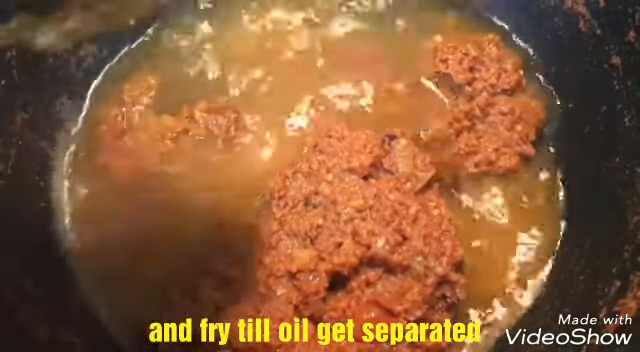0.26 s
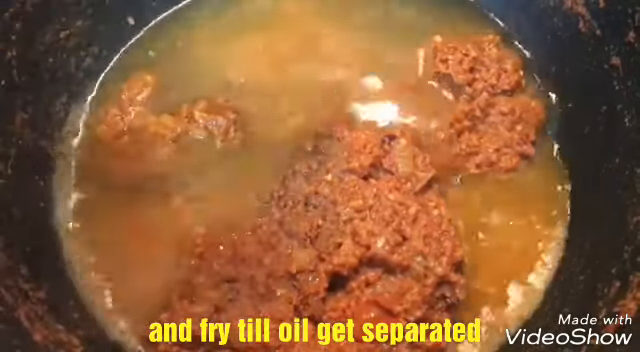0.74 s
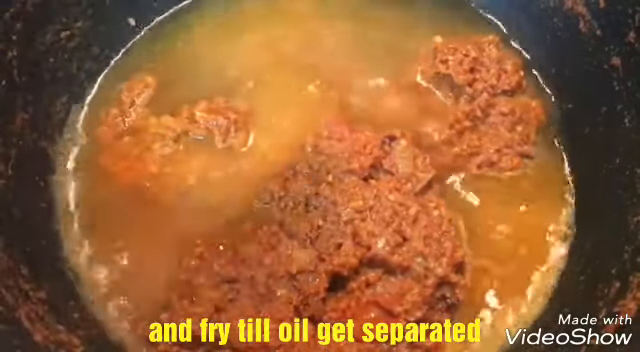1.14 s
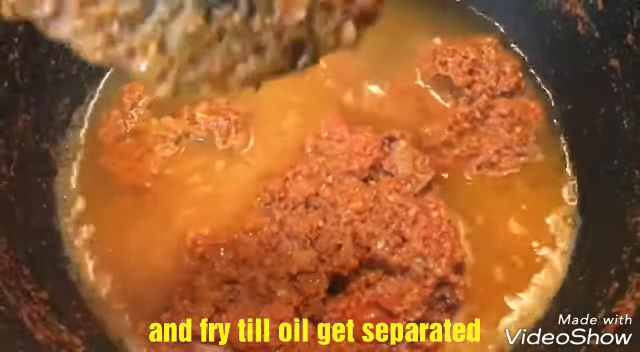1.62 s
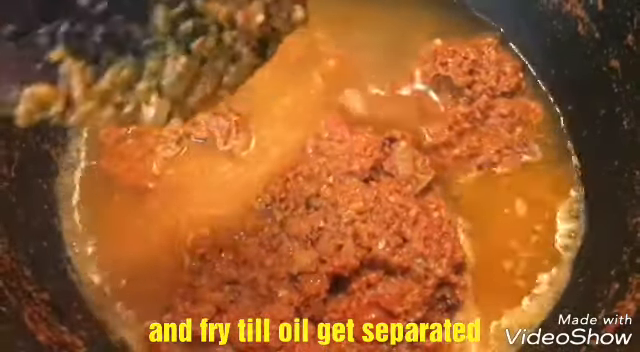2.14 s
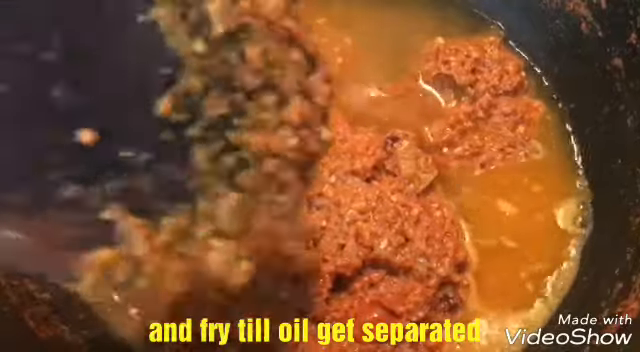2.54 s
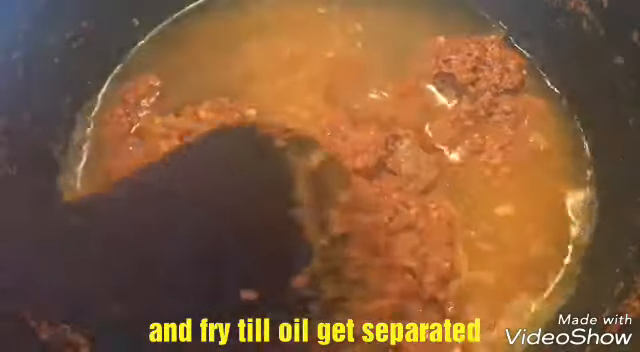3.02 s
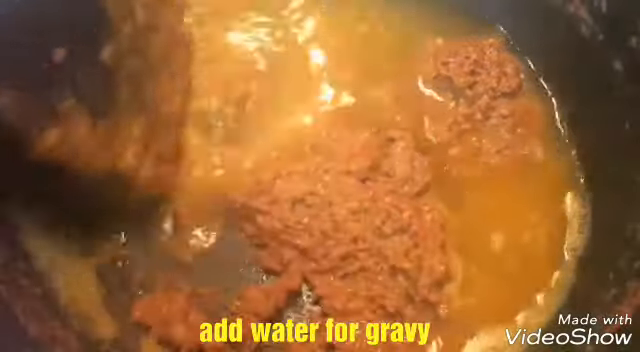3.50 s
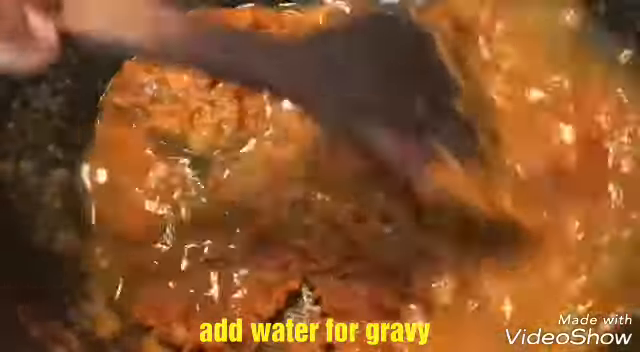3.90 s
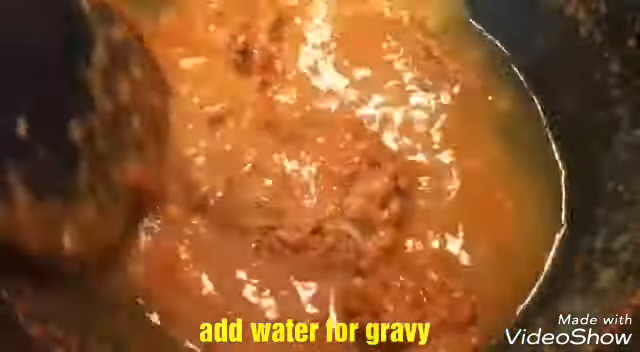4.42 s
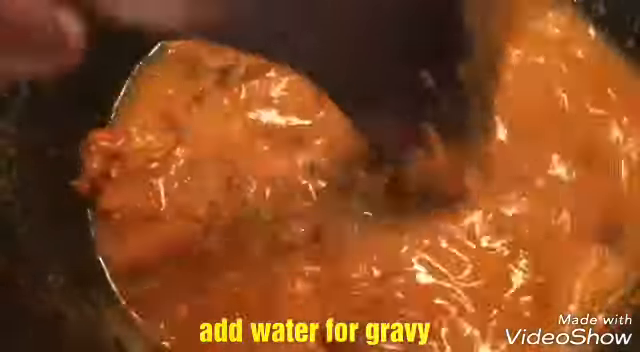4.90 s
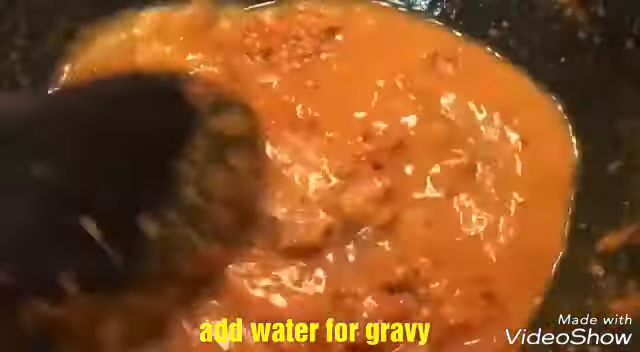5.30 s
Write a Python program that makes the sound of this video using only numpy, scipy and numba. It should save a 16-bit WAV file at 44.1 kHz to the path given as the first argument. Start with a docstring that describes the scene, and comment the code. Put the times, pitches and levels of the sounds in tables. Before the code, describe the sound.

Wet spice paste boils and sizzles loudly in hot oil, with sharp spits, one hard wooden knock, then wetter bubbling as it is stirred.

```python
"""A dense hiss and crackle comes first: wet spice paste boils in hot oil in a deep pan, close to a phone.
Steam bubbles burst in random swarms coloured by the pan's bowl; surges, blubs and sharp spits of oil stand out.
A low kitchen rumble of filtered noise lies below. A knock rings on wood as fading tones, and the room answers.
Later come soft spoon bumps made of loose tones, brief dulling by the spoon, and gurgles of sliding tones."""
import sys
import numpy as np
from scipy import signal
from scipy.fft import rfft, irfft, next_fast_len
from scipy.io import wavfile
from scipy.ndimage import uniform_filter1d, map_coordinates
from numba import njit

SR = 44100
rng = np.random.default_rng(int(sys.argv[2]) if len(sys.argv) > 2 else 0)


def wav_record(signal):
    """Record a signal, one row per channel, as 16-bit PCM in the file named by sys.argv[1]."""
    frames = np.transpose(np.atleast_2d(signal))
    bounded = np.clip(frames, -1, 1)
    # unit amplitude maps onto the largest positive 16-bit level
    quanta = np.round(bounded * 32767).astype(np.int16)
    wavfile.write(sys.argv[1], SR, quanta)


def attenuation_scalar(level_db):
    """Turn a level in dB into a linear amplitude multiplier (20 dB per decade)."""
    decades = np.asarray(level_db, float) / 20
    return 10 ** decades


N = 244755
T = np.arange(N) / SR
HZ = np.maximum(np.fft.rfftfreq(next_fast_len(N), 1 / SR), 1)


def unit(x):
    """Scale to an rms of 1."""
    return x / np.sqrt(np.mean(x ** 2))


def shape(x, gain):
    """Filter by a gain per frequency."""
    size = next_fast_len(N)
    return irfft(rfft(x, size) * gain, size)[:N]


def spectrum(points):
    """Gain of (pitch_hz, level_db) points joined on a log pitch axis."""
    hz, db = np.transpose(points)
    return attenuation_scalar(np.interp(np.log(HZ), np.log(hz), db))


def band(low_hz, high_hz, order=4):
    """Gain of a soft-edged band; neighbours add up to flat power."""
    low_edge = 1 + (low_hz / HZ) ** (2 * order)
    high_edge = 1 + (HZ / high_hz) ** (2 * order)
    return 1 / np.sqrt(low_edge * high_edge)


def walk(rate):
    """Random levels held 1 / rate s, smoothed twice, with the slow drift taken out; spread 1."""
    hold = int(SR / rate)
    steps = np.repeat(rng.standard_normal(N // hold + 1), hold)
    smooth = uniform_filter1d(uniform_filter1d(steps, hold), hold)[:N]
    return unit(smooth - uniform_filter1d(smooth, 2 * hold))


def add(out, start_s, level_db, pitch_hz, t60_s, rise_s, glide=0.):
    """Add a fading ring, cut off at t60_s (60 dB down); its pitch ends higher by a share of 2 * glide."""
    start = int(start_s * SR)
    t = T[:min(int(t60_s * SR), N - start)]
    fade = np.exp(-np.log(1000) * t / t60_s) * (1 - np.exp(-t / rise_s))
    tone = np.sin(2 * np.pi * pitch_hz * t * (1 + glide * t / t60_s))
    out[start:start + len(t)] += attenuation_scalar(level_db) * fade * tone


@njit
def rings(start, hz, size, cycles, glide):
    """Each trapped bubble rings for some cycles, rising a little as it nears the surface."""
    out = np.zeros(N)
    for k in range(len(start)):
        length = min(int(cycles * SR / hz[k]), N - start[k])
        fade = np.exp(-np.log(1000) / (cycles * SR / hz[k]))
        phase = 0.
        gain = size[k]
        for i in range(length):
            phase += 2 * np.pi * hz[k] / SR * (1 + glide * i / length)
            gain *= fade
            onset = min(16 * i / length, 1.)
            out[start[k] + i] += gain * onset * np.sin(phase)
    return out


# how hard the pan boils: (time_s, level_db), of which only the distance from a medium boil counts
BOIL = [(0, -31.5), (.3, -32), (.43, -30.5), (.53, -32.5), (.85, -32), (1.0, -33.5), (1.25, -33.5),
        (1.31, -34.5), (1.4, -34), (1.52, -35.5), (1.9, -35), (2.1, -34.5), (2.45, -35.5), (2.62, -36),
        (2.79, -36), (2.95, -38.5), (3.06, -39), (3.3, -33.5), (3.42, -34.5), (3.5, -36), (3.7, -33.5),
        (3.82, -35), (4.148, -33), (4.158, -38.5), (4.24, -36.5), (4.33, -36.5), (4.41, -34), (4.76, -35.5),
        (4.85, -36.5), (5.06, -39.5), (5.17, -41.5), (5.21, -40), (5.3, -40.5), (5.55, -40.5)]
MEDIUM_BOIL_DB = -35
# colour of the boiling: (pitch_hz, level_db)
COLOUR = [(240, -48), (400, -14.5), (721, -3), (1090, -8.5), (1450, -4.5), (1810, -5), (2100, -4.5),
          (4990, -3.5), (5640, -6), (9500, 0.5), (10600, -15), (13800, -30), (22000, -120)]
# air resonances of the pan's bowl: (pitch_hz, width_hz, gain_db)
BOWL = [(750, 110, 4), (1470, 300, 4.5), (1825, 82, -2.5), (3550, 330, -0.7), (4940, 160, -6),
        (5740, 960, 6.5), (6730, 730, 4), (10080, 440, 7)]
# bubble sizes, roughly fine to big: (low_hz, high_hz, bursts_per_s, size_spread_db, flicker_db, flickers_per_s,
# ringing_bubbles_per_s, ringing_level_db against the bursts)
SIZES = [(4305, 5350, 6000, 2, 1.35, 30, 150, -3.5), (5433, 12400, 15000, 0, 0.7, 32, 700, -8),
         (2978, 4270, 9000, 1.5, 1.35, 38, 260, -9.5), (1858, 2720, 6000, 6, 0.43, 31, 150, -7.5),
         (1142, 1900, 4000, 2.5, 0.8, 32, 160, -11), (441.5, 1240, 3000, 2.5, 0.63, 39, 140, -11)]
# how each size follows the boil, mostly less when bigger: (medium_boil_level_db, share of the boil's dB change)
FOLLOW = [(-43.5, 1.26), (-35.5, 1.19), (-39.5, 0.9), (-42, 0.58), (-43, 0.17), (-48.5, 0.47)]
SWARM_DB, SWARM_RATE = 0.37, 22.01  # flicker shared by all sizes: spread, steps per s
# a ringing bubble: cycles until 60 dB down, rise in pitch (share), range of sizes (dB)
RING_CYCLES, RING_GLIDE, RING_SPREAD_DB = 198, 0.027, 18.5
# inward snaps: per s, size spread, level against each size's rain
SNAP_RATE, SNAP_SPREAD_DB, SNAP_DB = 250, 3.5, -14


def boiling():
    """Each bubble size is a random rain of bursts in swarms, with a few that ring; returns it and a bare rain."""
    boil_db = np.interp(T, *np.transpose(BOIL)) - MEDIUM_BOIL_DB
    bowl_db = sum(db / (1 + (2 * (HZ - hz) / width) ** 2) for hz, width, db in BOWL)
    colour = spectrum(COLOUR) * attenuation_scalar(bowl_db)
    swarm, sizzle, bare_rain = walk(SWARM_RATE), 0, 0
    # collapsing steam pockets snap inward and reach every band at once
    snaps = -attenuation_scalar(SNAP_SPREAD_DB * rng.standard_normal(N)) * (rng.random(N) < SNAP_RATE / SR)
    for (level_db, share), row in zip(FOLLOW, SIZES):
        low_hz, high_hz, rate, spread_db, flicker_db, flickers, ringers, ring_db = row
        burst_size = rng.choice([-1, 1], N) * attenuation_scalar(spread_db * rng.standard_normal(N))
        bursts = (rng.random(N) < rate / SR) * burst_size
        when, pitch, size = rng.random((int(ringers * N / SR), 3)).T
        start = (when * N).astype(np.int64)
        ring_hz = low_hz + pitch * (high_hz - low_hz)
        ring_size = attenuation_scalar(RING_SPREAD_DB * size ** 2)  # mostly small, few loud
        bubbles = rings(start, ring_hz, ring_size, RING_CYCLES, RING_GLIDE)
        gain = colour * band(low_hz, high_hz)
        rain = unit(shape(bursts, gain)) + attenuation_scalar(ring_db) * unit(shape(bubbles, gain))
        rain = unit(rain + attenuation_scalar(SNAP_DB) * unit(shape(snaps, gain)))
        rain = rain * attenuation_scalar(SWARM_DB * swarm + flicker_db * walk(flickers))
        sizzle = sizzle + rain * attenuation_scalar(level_db + share * boil_db)
        bare_rain = bare_rain + rain * np.sqrt(high_hz - low_hz)  # evens out wide and narrow bands
    return sizzle, bare_rain


# surges of bubbles of one size, most of them where the spoon turns wet paste onto hot metal:
# (start_s, length_s, level_db, start_pitch_hz, end_pitch_hz)
SURGES = [(0, 0.029, -33.5, 1185, 1210), (0.028, 0.096, -39.5, 2196, 2110), (0.263, 0.2, -40.5, 2080, 2086),
          (0.502, 0.13, -43, 3500, 3500), (0.954, 0.18, -39, 2990, 3000), (1.099, 0.071, -34.5, 3110, 3280),
          (1.212, 0.059, -35, 3240, 3210), (1.3, 0.41, -43, 2167, 2190), (1.564, 0.13, -39.5, 4100, 4070),
          (1.594, 0.25, -43, 1598, 1617), (1.797, 0.043, -32.5, 6000, 6000),
          (1.906, 0.055, -34.5, 5520, 5450), (2.425, 0.18, -43, 2205, 2215),
          (3.041, 0.15, -41.5, 1642, 1707), (3.035, 0.043, -39.5, 2226, 2200),
          (3.101, 0.21, -42.5, 2900, 3130), (3.35, 0.14, -36, 3000, 3450), (3.33, .14, -41, 2300, 2400),
          (3.375, .06, -40, 4800, 4770), (3.53, 0.17, -40, 2350, 1850), (3.682, 0.13, -46.5, 800, 800),
          (3.79, 0.12, -36.5, 2670, 2230), (3.88, 0.18, -33.5, 2534, 3524), (3.899, 0.09, -39, 2795, 2720),
          (4.018, 0.069, -33.5, 2590, 3610), (4.095, 0.055, -44, 3400, 3400),
          (4.089, 0.044, -36, 2500, 2500), (3.871, 0.38, -39.5, 1506, 1491),
          (3.874, 0.46, -50.5, 743.5, 746), (4.195, 0.23, -42.5, 1495, 1500),
          (4.343, 0.081, -34, 2250, 2450), (4.375, 0.056, -41, 3680, 3800), (4.38, 0.25, -38.5, 1347, 1319),
          (4.52, 0.2, -43, 1650, 1623), (4.445, 0.11, -47, 721, 728), (3.68, 0.77, -59, 420, 420),
          (4.39, 0.7, -48.5, 450, 450), (4.647, 0.091, -45, 700, 752), (4.737, .17, -44, 700, 754),
          (4.453, 0.48, -48, 1001, 1000), (4.68, .25, -44.5, 950, 1050), (4.78, .12, -52, 320, 320),
          (5.4, .2, -54, 550, 550), (3.7, 0.46, -53.5, 1000, 1000), (4.42, 0.34, -46, 2007, 2004),
          (4.722, .05, -36, 5500, 5500), (4.704, 0.068, -39, 2300, 2105), (4.76, 0.33, -40.5, 1300, 1398),
          (5.143, 0.13, -46.5, 1395, 1400), (4.876, 0.13, -47, 1956, 1900), (4.972, 0.14, -55, 700, 700),
          (5.327, 0.3, -48.5, 720, 720), (5.41, 0.24, -46, 1192, 1292), (5.4, 0.25, -47, 956, 945)]
SURGE_OCTAVES, SURGE_ORDER = .17, 8  # half width in pitch, steepness of its edges
SURGE_ROUND = 0.49  # 0 = flat top, higher = rounder swell
SURGE_FIZZ_DB = 5  # countless tiny bubbles that smooth a surge, against its distinct ones


def surges(bare_rain):
    """Each surge swells and dies as a further rain of bubbles, whose size drifts from one pitch to another."""
    fizz = unit(shape(rng.standard_normal(N), spectrum(COLOUR)))
    # half the scene away, so that a surge does not repeat the bursts it sits on
    rain = unit(np.roll(bare_rain, N // 2)) + attenuation_scalar(SURGE_FIZZ_DB) * fizz
    out = np.zeros(N)
    for start_s, length_s, level_db, start_hz, end_hz in SURGES:
        first, count = int(start_s * SR), int(length_s * SR)
        share = np.arange(count) / count
        piece = np.roll(rain, -first)[:2 * count]
        ratio = np.maximum(np.fft.rfftfreq(2 * count, 1 / SR), 20) / start_hz
        low_edge = 1 + (ratio * 2 ** SURGE_OCTAVES) ** -SURGE_ORDER
        high_edge = 1 + (ratio / 2 ** SURGE_OCTAVES) ** SURGE_ORDER
        sized = irfft(rfft(piece) / np.sqrt(low_edge * high_edge))
        # reading faster or slower moves the pitch
        position = np.cumsum((end_hz / start_hz) ** share)
        glided = map_coordinates(sized, [position], mode="wrap")
        swell = np.sin(np.pi * share) ** SURGE_ROUND
        out[first:first + count] += (attenuation_scalar(level_db) * swell * unit(glided))[:N - first]
    return out


# kitchen rumble: (pitch_hz, level_db)
RUMBLE = [(15, -45), (25, 2), (70, -6), (97, -1), (123, -6.5), (194, -4), (270, -7), (352, -3), (466, -11),
          (600, 6), (780, -5), (1320, -120)]
RUMBLE_DB = -53.5


def rumble():
    """Burner and house rumble: low filtered noise that wavers a little."""
    low = shape(rng.standard_normal(N), spectrum(RUMBLE) * band(20, 470))
    return unit(low) * attenuation_scalar(RUMBLE_DB + 1.6 * walk(6.1))


# lone big bubbles: (start_s, level_db, start_pitch_hz, t60_s)
BLUBS = [(0.001, -17.5, 1680, 0.026), (.009, -23, 1400, .03), (0.044, -23.5, 1046, 0.035),
         (1.885, -27, 1470, 0.065), (4.875, -30, 1240, 0.06), (1.628, -26, 1650, .05),
         (5.44, -41, 720, 0.065)]


def blubs():
    """A big bubble rings as one fading tone that rises as it closes."""
    out = np.zeros(N)
    for start_s, level_db, pitch_hz, t60_s in BLUBS:
        add(out, start_s, level_db, pitch_hz, t60_s, rise_s=.002, glide=0.062)
    return out


# lone loud spits of oil: (peak_s, peak_level_db, pitch_hz)
SPITS = [(.2081, -14, 7010), (1.524, -12, 5070), (1.589, -15, 4160), (1.803, -20, 6730),
         (3.3155, -13, 5730), (3.3711, -11, 3660), (3.418, -15, 4470), (3.4938, -17, 4540),
         (3.816, -15, 5270), (3.896, -18, 5000), (3.936, -16, 4500), (4.372, -22, 3500),
         (4.3925, -18, 2600), (4.3998, -15, 2500), (4.4054, -19, 4000), (4.7418, -10, 5260)]
SPIT_CYCLES = 0.55  # half length of the crack


def spits():
    """A spit is one short inward crack: about one cycle under a bell-shaped fade."""
    out = np.zeros(N)
    for peak_s, level_db, pitch_hz in SPITS:
        cycles = pitch_hz * (T - peak_s)
        out -= attenuation_scalar(level_db) * np.cos(2 * np.pi * cycles) * np.exp(-(cycles / SPIT_CYCLES) ** 2)
    return out


# the knock, blow and rebounds: (start_s, level_db)
KNOCK = [(1.3573, -8), (1.3584, -1.5), (1.3644, -4), (1.382, -16)]
# what the knocked wood rings with: (pitch_hz, level_db, t60_s)
WOOD = [(105, -31, 0.12), (293, -18, 0.07), (420, -26, .05), (495, -20, .06), (631, -16.5, 0.062),
        (919, -18, 0.08), (1025, -20, 0.11), (1174, -18, 0.11), (1190, -32, .25), (1230, -23, 0.14),
        (1486, -18, 0.065), (1705, -24.5, 0.06), (1965, -28, 0.047), (2100, -20, 0.045), (2390, -31, .03)]
# the room's answer to the knock: (low_hz, high_hz, t60_s, starting_level_db)
ROOM = [(42, 72, 0.76, -48), (83, 170, 0.85, -41), (165, 300, 0.87, -36.5), (420, 800, 0.64, -31.5),
        (700, 1280, 0.58, -29), (970, 1250, 0.56, -25), (1330, 1750, 0.42, -29.5), (1900, 2600, 0.21, -34)]


def knock():
    """Blow and rebounds ring the wood, neighbouring modes in opposite sense; the room adds a diffuse tail."""
    out = np.zeros(N)
    for start_s, blow_db in KNOCK:
        for k, (pitch_hz, level_db, t60_s) in enumerate(WOOD):
            ring = np.zeros(N)
            add(ring, start_s, blow_db + level_db, pitch_hz, t60_s, rise_s=.0013)
            out += (-1) ** k * ring
    since = np.maximum(T - KNOCK[0][0], 0)
    build = 1 - np.exp(-since / 0.0038)  # echoes need some time to gather
    for low_hz, high_hz, t60_s, level_db in ROOM:
        echoes = unit(shape(rng.standard_normal(N), band(low_hz, high_hz, order=7)))
        out += attenuation_scalar(level_db - 60 * since / t60_s) * build * echoes
    return out


# soft bumps of the spoon on the pan: (start_s, level_db, pitch_hz, t60_s)
BUMPS = [(2.447, -41, 200, 0.14), (3.779, -43, 226, 0.12), (4.17, -38, 87, 0.1), (4.656, -34, 108, 0.11),
         (4.819, -39, 262.5, 0.26), (5.108, -43, 91, 0.14), (5.204, -43.5, 236, 0.29),
         (5.501, -46, 330, 0.23)]


def bumps():
    """A bump is a dull thud of four loose partials that fade together."""
    out = np.zeros(N)
    for start_s, level_db, pitch_hz, t60_s in BUMPS:
        for ratio, partial_db in ((.72, -8.5), (1, -1.5), (1.47, -6), (2.3, -6.5)):
            add(out, start_s, level_db + partial_db, ratio * pitch_hz, t60_s, rise_s=.004)
    return out


# the spoon shades the pan and dulls one stretch of the sizzle: (start_s, length_s, first_level_db, low_hz, high_hz)
SHADES = [(4.153, .1, -5, 3800, 4900), (3.0, .12, -2, 3200, 5300), (5.1, .2, -2, 3200, 5600)]


def shaded(sizzle):
    """The spoon covers a band of the sizzle at once and lifts away gradually."""
    for start_s, length_s, level_db, low_hz, high_hz in SHADES:
        share = (T - start_s) / length_s
        arrive = np.clip(share * length_s / .004, 0, 1)  # within 4 ms
        leave = np.clip(2 * (1 - share), 0, 1)  # over the second half
        lost = 1 - attenuation_scalar(level_db * arrive * leave)
        sizzle = sizzle - lost * shape(sizzle, band(low_hz, high_hz, order=6))
    return sizzle


# narrow gurgles of air drawn through the wet paste: (start_s, length_s, level_db, start_pitch_hz, end_pitch_hz)
GURGLES = [(3.56, .12, -45, 2300, 1900), (4.46, .06, -44, 1365, 1294), (4.47, .12, -49, 750, 759),
           (4.545, .05, -47, 1720, 1600), (4.657, 0.038, -44, 740, 740), (4.745, 0.158, -44, 690, 780),
           (4.865, 0.087, -45, 1215, 1500)]
GURGLE_WAVER, GURGLE_THROB_DB = .012, 3  # pitch unsteadiness (share), level unsteadiness


def gurgles():
    """Each gurgle is one air pocket whose pitch slides and wavers while its level throbs."""
    out = np.zeros(N)
    waver = 1 + GURGLE_WAVER * walk(90)
    throb = attenuation_scalar(GURGLE_THROB_DB * walk(60))
    for start_s, length_s, level_db, start_hz, end_hz in GURGLES:
        share = np.clip((T - start_s) / length_s, 0, 1)
        pitch_hz = start_hz * (end_hz / start_hz) ** share * waver
        phase = 2 * np.pi * np.cumsum(pitch_hz) / SR
        swell = np.sqrt(np.abs(np.sin(np.pi * share))) * (share < 1)
        out += attenuation_scalar(level_db) * swell * throb * np.sin(phase)
    return out


def scene():
    """One microphone feeds both channels."""
    sizzle, bare_rain = boiling()
    pan = shaded(sizzle) + surges(bare_rain) + gurgles()
    mono = pan + rumble() + blubs() + spits() + knock() + bumps()
    return np.array([mono, mono])


def roll_off(x):
    """The treble ends steeply here."""
    return signal.sosfilt(signal.butter(12, 10810, fs=SR, output="sos"), x)


MIC_LOW_HZ, TOP_HZ = 62.5, 10690


def record(dry):
    """The phone thins the bass and cuts the top steeply."""
    thin = signal.sosfilt(signal.butter(3, MIC_LOW_HZ, "high", fs=SR, output="sos"), dry)
    mix = signal.sosfilt(signal.ellip(8, .3, 70, TOP_HZ, fs=SR, output="sos"), thin)
    return roll_off(mix)


dry = scene()
out = record(dry)
wav_record(out)
```